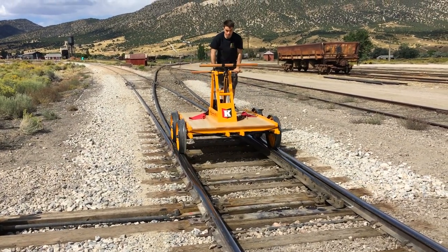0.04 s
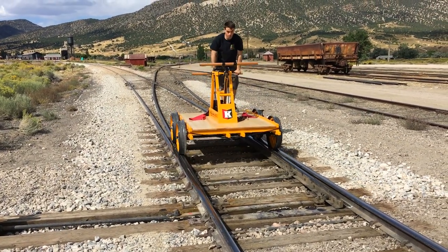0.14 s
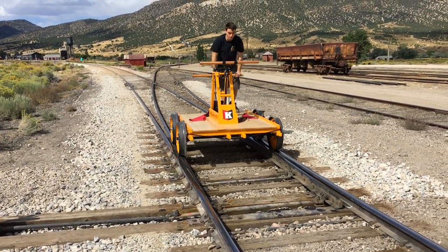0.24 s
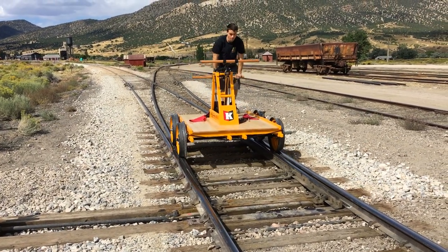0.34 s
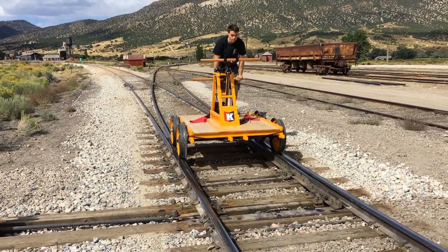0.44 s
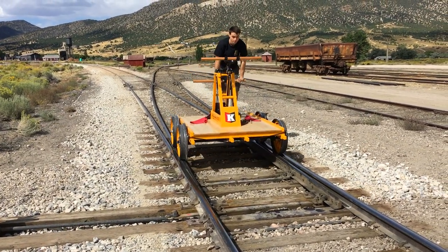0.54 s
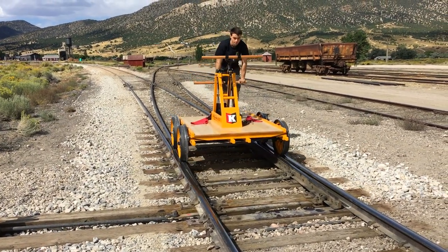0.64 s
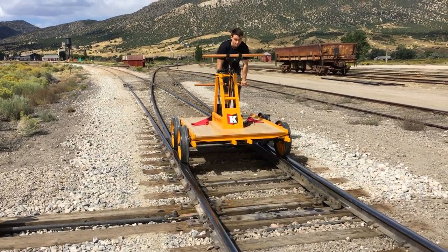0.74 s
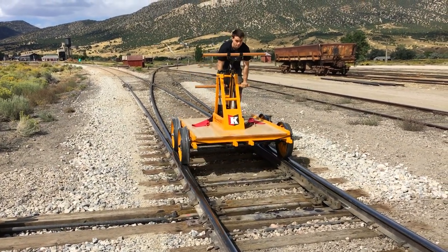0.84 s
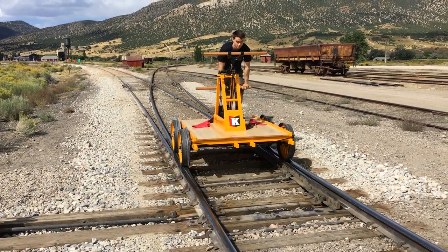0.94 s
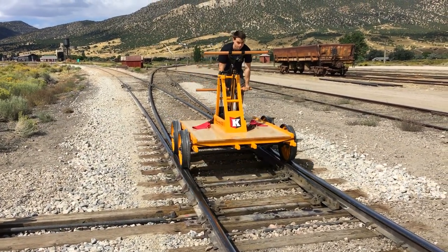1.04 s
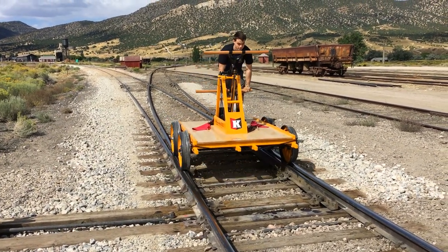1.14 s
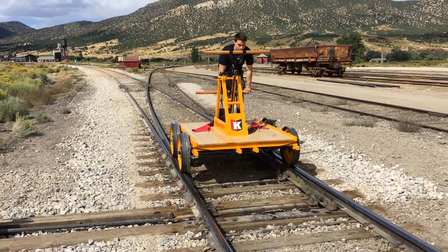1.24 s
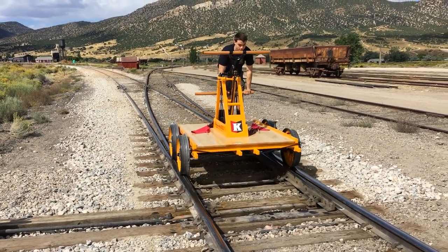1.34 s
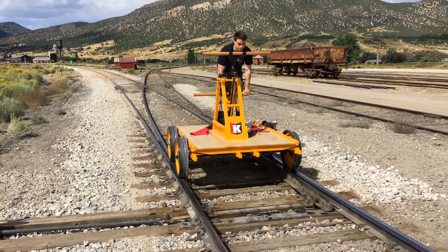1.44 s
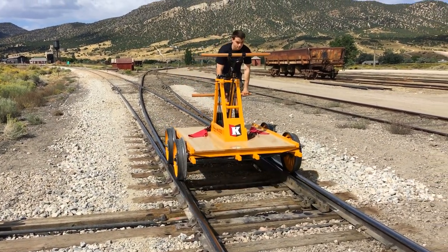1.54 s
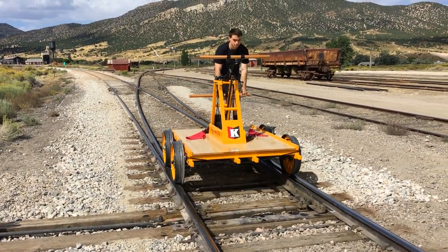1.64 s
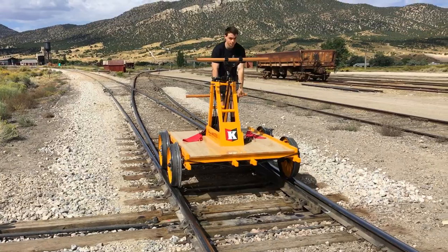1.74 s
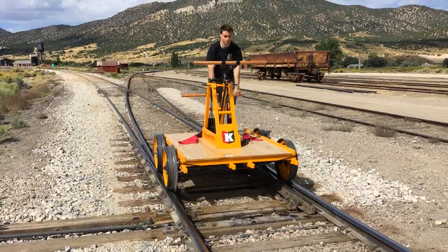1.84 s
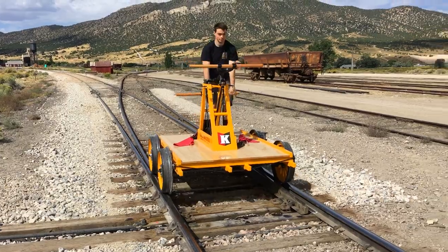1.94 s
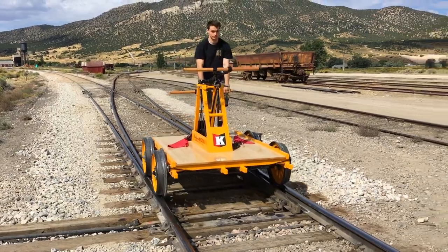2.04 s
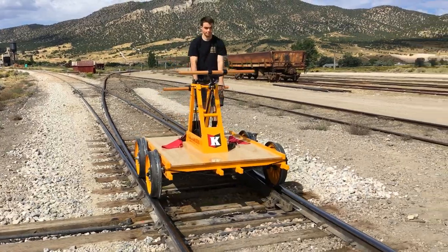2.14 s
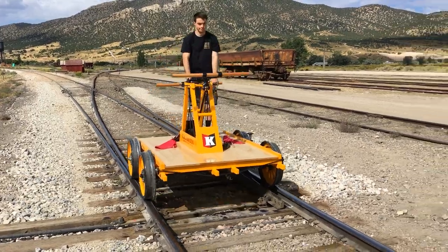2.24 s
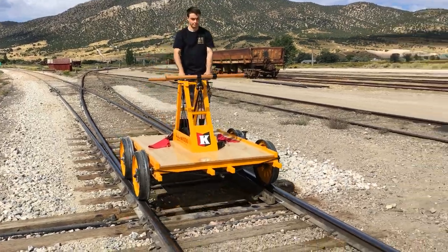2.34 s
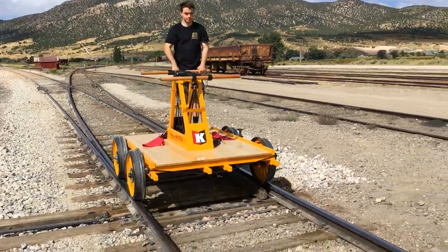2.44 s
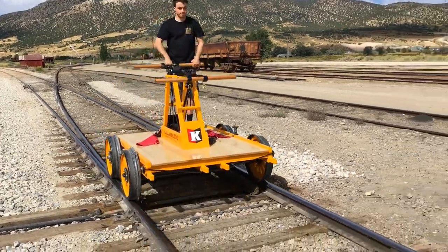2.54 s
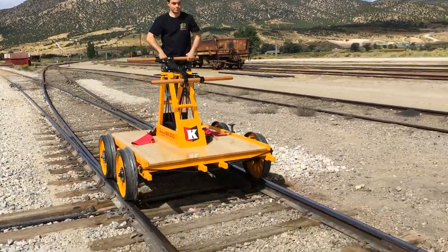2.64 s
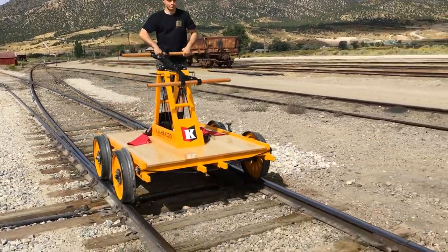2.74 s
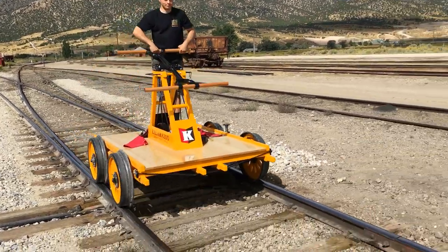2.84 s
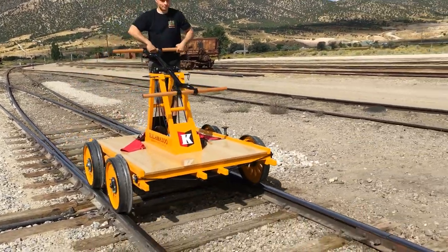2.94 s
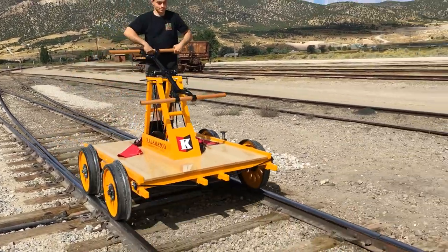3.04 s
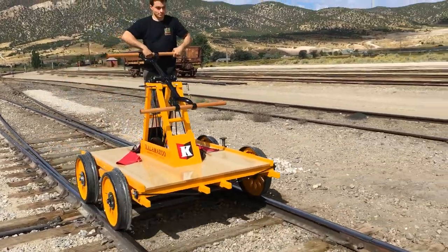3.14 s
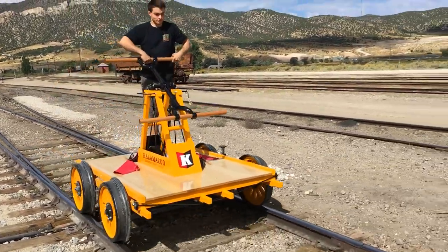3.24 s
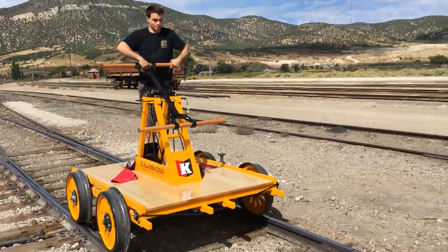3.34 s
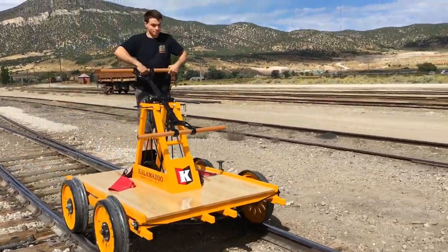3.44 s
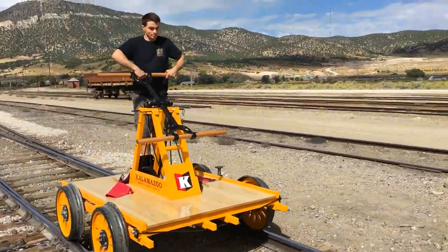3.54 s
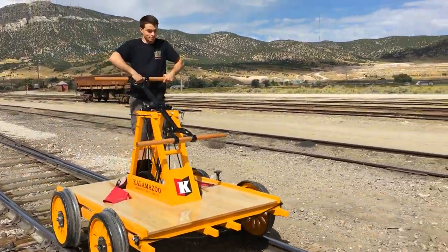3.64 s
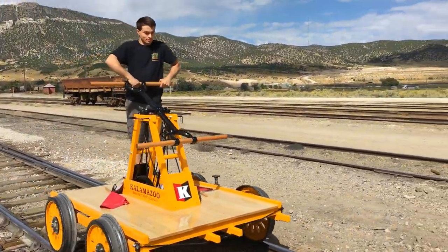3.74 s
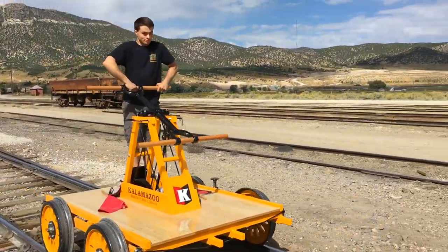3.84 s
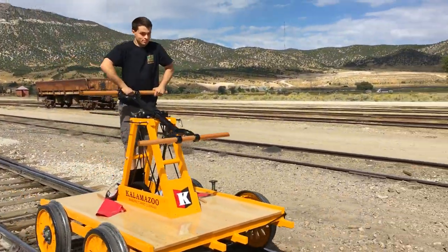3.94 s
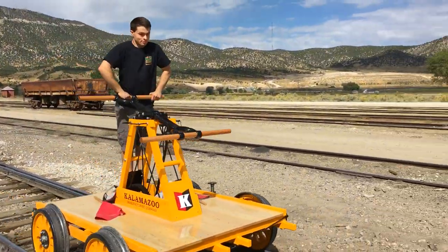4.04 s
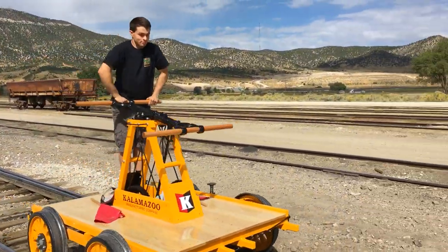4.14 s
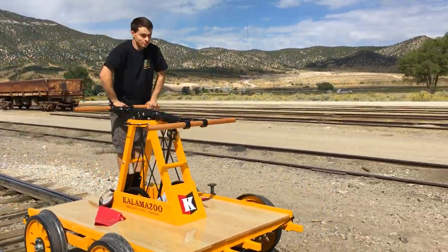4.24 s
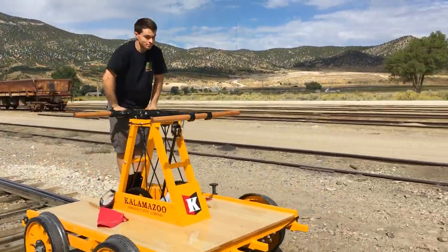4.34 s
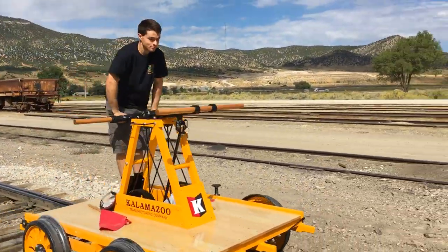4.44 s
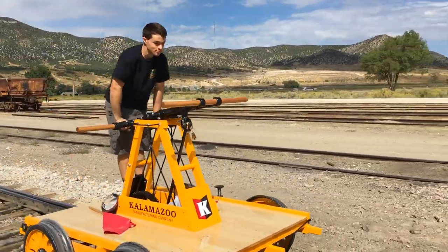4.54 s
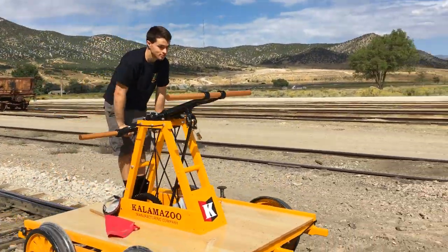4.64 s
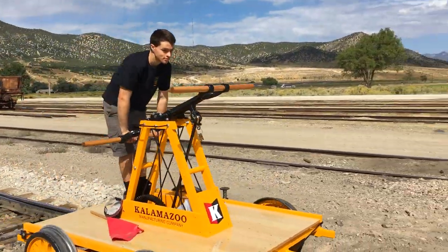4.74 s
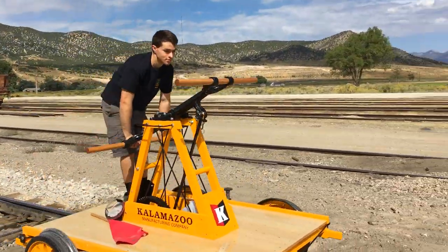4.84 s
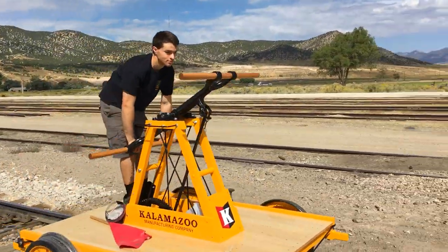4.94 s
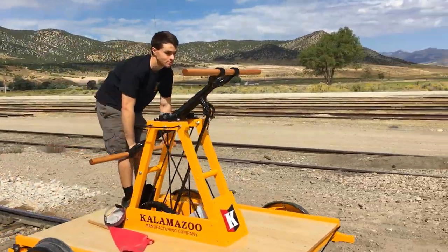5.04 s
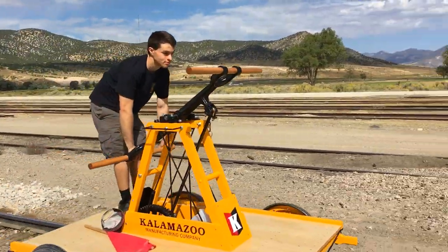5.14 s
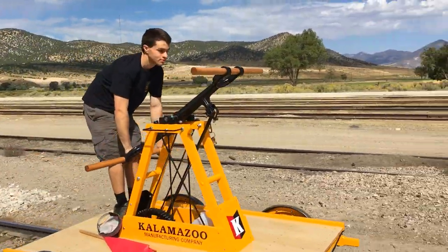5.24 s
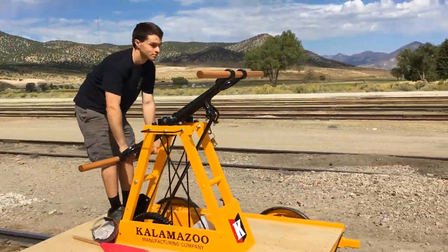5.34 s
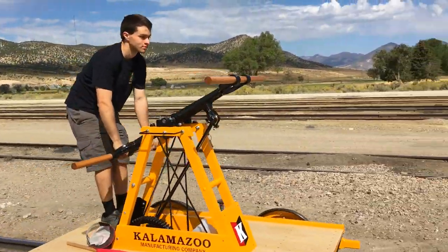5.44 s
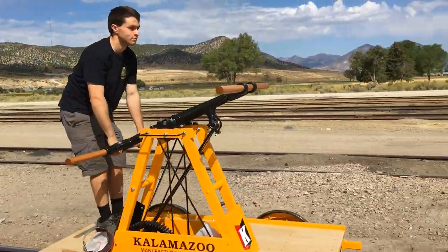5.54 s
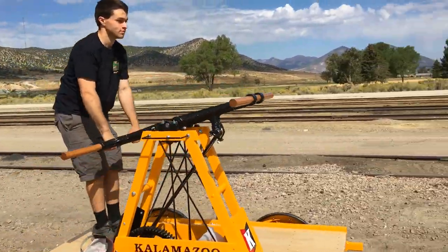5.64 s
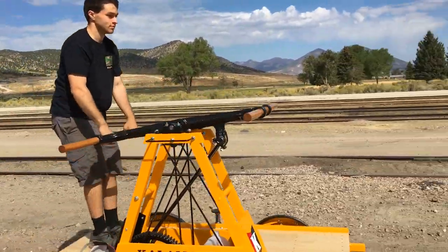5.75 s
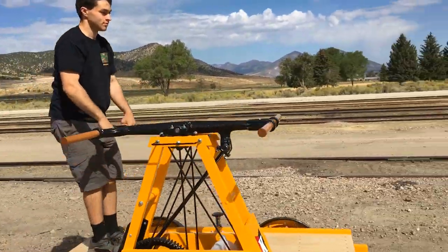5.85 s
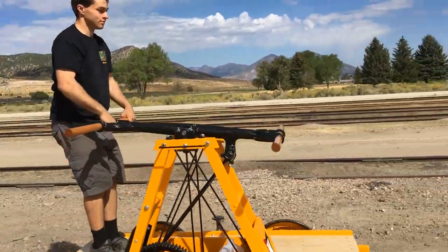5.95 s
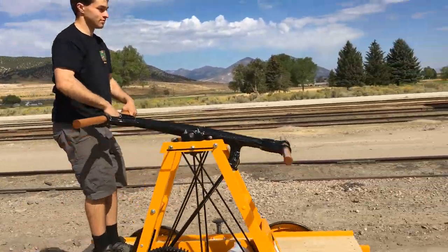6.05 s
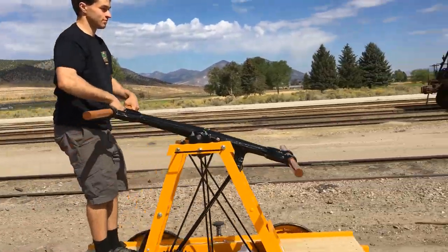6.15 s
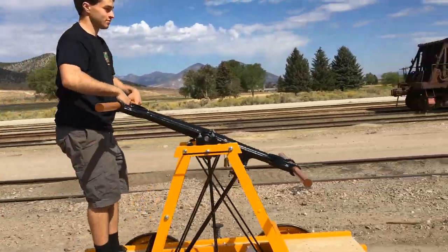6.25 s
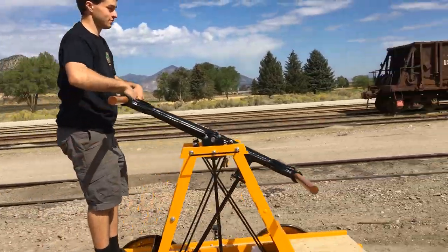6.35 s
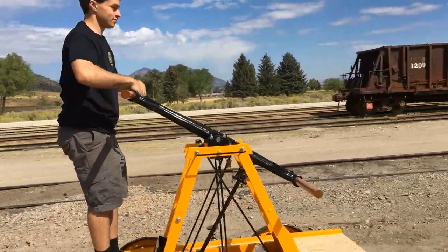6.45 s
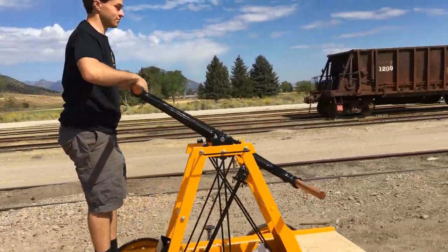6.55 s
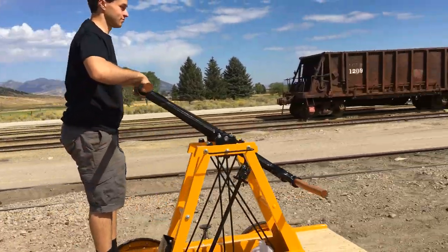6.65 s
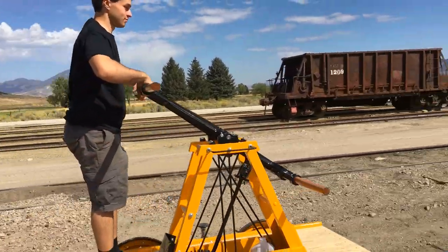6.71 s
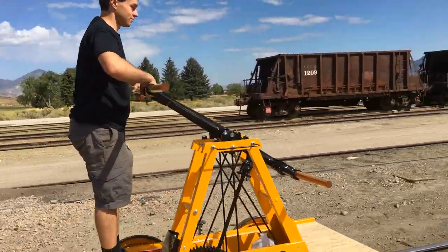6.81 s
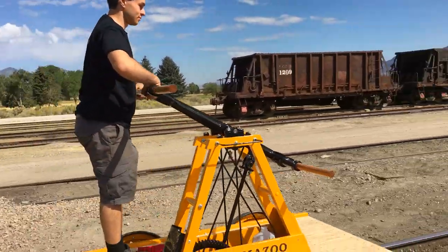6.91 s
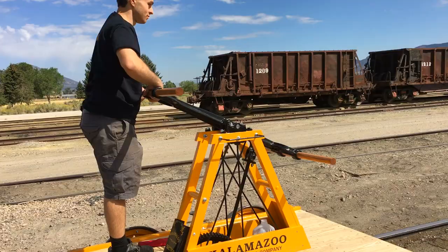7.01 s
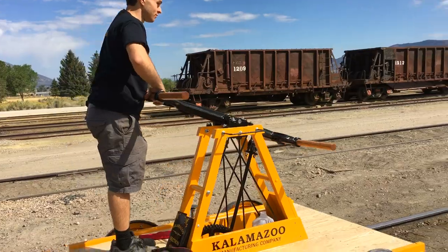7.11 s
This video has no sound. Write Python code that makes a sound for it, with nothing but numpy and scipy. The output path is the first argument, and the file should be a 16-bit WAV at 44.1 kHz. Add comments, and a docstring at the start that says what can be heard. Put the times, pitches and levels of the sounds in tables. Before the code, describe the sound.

A hand-pumped rail car rolls closer on steel track, rumbling and rattling louder, crunching grit and clacking twice over a rail joint.

```python
"""A hand-pumped rail car rolls up along steel track in an open yard, heard from close beside the line.
Tread roughness drives the wheels and rails into ringing and shakes the wooden deck and frame.
Both axles clack over a rail joint, and the car gives off knocks, rattles and short wheel pings.
Close by, crushed grit ticks, crunches, snaps and squeaks, and fine dust scuffs. Beneath lie dull low
thumps and an uneven rumble, partly wind buffeting the microphone, and the far hum of the yard."""
import sys
import numpy as np
from scipy import signal
from scipy.fft import rfft, irfft, next_fast_len
from scipy.io import wavfile
from scipy.ndimage import uniform_filter1d

SR = 44100
rng = np.random.default_rng(int(sys.argv[2]) if len(sys.argv) > 2 else 0)


def unload_audio(sound):
    """Save the sound as a 16-bit wav file, at the path given as the first command line argument."""
    columns = np.transpose(np.atleast_2d(sound))
    # keep every value between -1 and 1, then stretch to whole-number steps
    steps = np.round(np.clip(columns, -1, 1) * 32767)
    wavfile.write(sys.argv[1], SR, steps.astype(np.int16))


N = 316549


def from_db(db):
    """Decibels to amplitude ratio."""
    return 10 ** (np.asarray(db) / 20)


def rms_one(x):
    """Normalisation to unit rms."""
    return x / np.sqrt(np.mean(x ** 2) + 1e-20)


def peak_one(x):
    """Normalisation to unit peak."""
    return x / np.abs(x).max()


def drift(rate):
    """Random modulation: low-passed noise of unit rms, its corner near `rate` Hz."""
    r = np.exp(-80 * np.pi * rate / SR)
    slow = signal.lfilter([1], [1, -2 * r, r * r], rng.standard_normal(N // 40 + 2002))[2000:]
    return np.interp(np.arange(N) / 40, np.arange(len(slow)), rms_one(slow))


def coloured(x, spectrum):
    """Spectral shaping by a (frequency [Hz], level [dB]) curve, to unit rms."""
    hz, db = np.transpose(spectrum)
    size = next_fast_len(N)
    log_hz = np.log(np.arange(size // 2 + 1) * SR / size + 1)
    gain = from_db(np.interp(log_hz, np.log(hz), db, left=-90, right=-90))
    return rms_one(irfft(rfft(x, size) * gain, size)[:N])


def ring(x, hz, t60):
    """Damped resonator: its impulse response is a sine that falls 60 dB in t60 seconds."""
    r, w = from_db(-60 / (t60 * SR)), 2 * np.pi * hz / SR
    return signal.lfilter([0, np.sin(w)], [1, -2 * r * np.cos(w), r * r], x + 1e-18)


def band(x, low_hz, high_hz):
    """Causal band-pass filter."""
    sos = signal.butter(2, [low_hz, min(high_hz, .45 * SR)], "band", fs=SR, output="sos")
    return signal.sosfilt(sos, x)


def add(out, s, piece):
    """Superposition of a short sound at time s."""
    i = round(s * SR)
    out[i:i + len(piece)] += piece[:N - i]


def grains(per_s, spread_db):
    """Poisson process: clicks of random size and sign."""
    sizes = from_db(spread_db * np.minimum(rng.exponential(1, N), 5)) * rng.choice([-1, 1], N)
    return sizes * (rng.random(N) < per_s / SR)


def crushing(patches):
    """Attack and decay envelope: each patch swells quickly, sags while it lasts and dies away."""
    rise_s, sag_db_per_s, fall_db_per_s = 0.014, 10, 308.5
    out, t = np.zeros(N), np.arange(N) / SR
    for s, length, db in patches:
        sag_db = sag_db_per_s * np.clip(t - s, 0, length)
        fall_db = fall_db_per_s * np.clip(t - s - length, 0, 1)
        out += np.clip((t - s) / rise_s, 0, 1) * from_db(db - sag_db - fall_db)
    return out


# spectrum of the yard's far hum: (frequency [Hz], level [dB])
YARD_SPECTRUM = [(190, -38.5), (330, -1), (580, -2.5), (691, -6.5), (724, -1.5), (2520, -21), (3000, -45.5),
                 (3900, -67.5), (6600, -120)]


def yard():
    """Ambient noise: a steady, distant hum, strongest in the low middle range."""
    return from_db(-64) * coloured(rng.standard_normal(N), YARD_SPECTRUM)


# spectrum of the low rumble: (frequency [Hz], level [dB])
RUMBLE_SPECTRUM = [(12, -40), (22, -21), (43, 6), (92, 2.5), (110, -16), (140, -28), (240, -120)]


def rumble():
    """Amplitude-modulated noise: an uneven low rumble, partly wind buffeting the microphone."""
    return rms_one(coloured(rng.standard_normal(N), RUMBLE_SPECTRUM) * from_db(-2.0 * drift(29)))


# dull low thumps, partly wind on the microphone: (time [s], relative level [dB], frequency [Hz])
LOW_THUMPS = [(0.785, -32, 62.6), (1.189, -32, 65.3), (1.889, -34, 56), (2.059, -31, 66), (3.166, -25, 284),
              (3.424, -21.5, 93), (3.489, -19.5, 108), (3.61, -35, 62.5), (3.674, -22.5, 82),
              (3.777, -41, 51.5), (3.888, -18.5, 139), (3.953, -22, 110), (3.99, -39, 141),
              (4.009, -25.5, 90), (4.15, -18, 100), (4.229, -22, 310), (4.249, -20, 190), (4.266, -28, 262),
              (4.278, -25.5, 430), (4.301, -16, 83), (4.339, -24, 57), (4.342, -15.5, 197),
              (4.373, -18, 87), (4.405, -20, 90), (4.446, -16, 88), (4.66, -26, 294), (4.958, -19.5, 127),
              (5.055, -14.5, 85), (5.188, -12.5, 237), (5.289, -31, 230), (5.33, -22, 296),
              (5.39, -20, 287), (5.44, -29, 260), (5.591, -18.5, 305), (5.659, -16.5, 222),
              (5.777, -17.5, 288), (5.746, -27, 126), (5.79, -19, 119), (5.841, -24, 119), (5.88, -24, 119),
              (5.98, -22, 270), (6.028, -16, 215), (6.197, -30, 227), (6.389, -18.5, 281),
              (6.557, -21, 235), (6.229, -15, 261), (6.32, -18.5, 280), (6.673, -12.5, 222),
              (6.706, -14, 258), (6.727, -15, 269), (6.741, -18, 259), (6.853, -16.5, 284),
              (6.863, -19.5, 283), (6.919, -17, 245), (6.933, -19.5, 257), (7.05, -24, 262),
              (7.103, -22, 206)]


def low_thumps():
    """Damped oscillation: each dull thump is a one-cycle push on a resonator; higher ones die sooner."""
    out, t = np.zeros(N), np.arange(7000) / SR
    for s, db, hz in LOW_THUMPS:
        push = np.sin(2 * np.pi * np.clip(t * hz, 0, 1))
        add(out, s, from_db(db - 4.5) * peak_one(ring(push, hz, t60=0.095 * (100 / hz) ** 0.3)))
    return out


# spectrum of fine dust: (frequency [Hz], level [dB])
DUST_SPECTRUM = [(1500, -20), (2500, 7), (4000, 2.5), (6000, -12), (9000, -21), (12000, -25)]
# soft scuffs: (time [s], duration [s], level [dB])
DUST_SCUFFS = [(0.6, 0.09, -87), (0.715, 0.046, -79), (0.81, 0.02, -78), (1.028, 0.01, -79),
               (2.3, 0.027, -74), (2.495, 0.022, -64), (2.98, 0.035, -51), (3.04, 0.022, -49.5),
               (3.095, 0.048, -54), (3.18, 0.06, -61), (5.75, 0.046, -67.5), (5.89, 0.23, -71),
               (6.11, 0.057, -67), (6.2, 0.054, -69)]


def dust(steel_db):
    """Shot noise: tiny grains in loose clumps, heard in scuffs and faintly under the rolling wheels."""
    clumps = grains(5000 * from_db(6.5 * drift(59)), 2.2)
    return (crushing(DUST_SCUFFS) + from_db(steel_db - 25.5)) * coloured(clumps, DUST_SPECTRUM)


# spectrum of crushed grit: (frequency [Hz], level [dB])
GRIT_SPECTRUM = [(710, -46), (1200, 16), (1280, -5.5), (1950, 6), (3510, -7), (5300, -11), (7100, -23.5),
                 (12200, -23), (13300, -23.5), (15700, -29.5), (16000, -50.5)]
# patches of grit crushed: (time [s], duration [s], level [dB])
GRIT_PATCHES = [(1.99, 0.3, -63), (2.968, 0.1, -50), (3.078, 0.26, -56.5), (3.37, 0.031, -55),
                (3.49, 0.16, -54.5), (4.176, 0.036, -54), (4.533, 0.023, -62), (4.661, 0.014, -46),
                (4.733, 0.08, -48.5), (4.818, 0.019, -36), (5.135, 0.045, -53), (5.743, 0.62, -68)]


def crunch(steel_db):
    """Granular crushing: clumps of fine grains, and sparser cracks ringing at scattered pitches."""
    fine = coloured(grains(3000 * from_db(7.4 * drift(48)), 1.9), GRIT_SPECTRUM)
    cracks, pitch_index = grains(600, 3.0), rng.integers(0, 12, N)
    pitches = np.geomspace(1500, 13000, 12)
    rings = sum(hz * ring(cracks * (pitch_index == k), hz, 20.0 / hz) for k, hz in enumerate(pitches))
    loose_grit = from_db(steel_db - 26)
    return (crushing(GRIT_PATCHES) + loose_grit) * rms_one(fine + coloured(rings, GRIT_SPECTRUM))


def crack(noise, hz, treble_hz, t60, treble_db):
    """Noise transient: a burst breaks in small steps, its treble decaying sooner than its body."""
    rise_s, treble_decay_share = .0017, 0.85
    t = np.arange(noise.shape[1]) / SR
    steps = from_db(3.1 * rms_one(uniform_filter1d(noise[2], size=60)))
    fade = steps * (1 - np.exp(-t / rise_s)) * from_db(-60 * t / t60)
    treble_fade = fade * from_db(-60 * t / t60 * (1 / treble_decay_share - 1))
    body = band(band(noise[0] * fade, hz / 7.6, hz * 1.185), 400, hz * 2.02)
    treble = band(band(noise[1] * treble_fade, treble_hz / 2.8, treble_hz * 1.57), 1500, 18000)
    return peak_one(body) + from_db(treble_db) * peak_one(treble)


# ticks of grit: (time [s], body peak [dB], treble re body [dB])
GRIT_TICKS = [(0.248, -69, 6), (0.265, -57, -22), (0.342, -57, -18), (0.3695, -51, -13), (0.41, -66, -6),
              (0.671, -65, 2), (0.77, -63, 1), (1.031, -49.5, -9.5), (1.16, -45.5, -7.5),
              (1.402, -45.5, -23), (1.5403, -55, -10), (1.752, -55, -25), (1.862, -53, -6),
              (1.8947, -55, -6), (2.021, -44.5, -23), (2.0424, -46.5, -19), (2.11, -47, -25),
              (2.128, -42.5, -19), (2.2223, -53, -8), (2.273, -46.5, -7), (2.3215, -48, -10),
              (2.5027, -41.5, -14), (2.6524, -65, 4), (2.806, -43, -20), (2.861, -54, -1),
              (2.913, -43.5, -10.5), (2.9498, -30, -27), (2.9831, -30.5, -27), (3.005, -30, -30),
              (3.0196, -34, -18), (3.0394, -29.5, -38), (3.0514, -35, -34), (3.107, -39, -11),
              (3.1382, -40, -6), (3.164, -47, -6), (3.1852, -33.5, -29), (3.2139, -35.5, -22),
              (3.2394, -53, -15), (3.257, -41.5, -8.5), (3.275, -44, -13), (3.304, -30.5, -24),
              (3.3883, -31.5, -27), (3.498, -53, -22), (3.5352, -36, -23), (3.6037, -31, -36),
              (3.633, -47, -29), (4.186, -32, -12), (4.3396, -25.5, -19), (4.542, -30.5, -15),
              (4.563, -34.5, -19), (4.6157, -35, -18), (4.6704, -27, -19), (4.69, -31, -20),
              (4.784, -28, -26), (4.806, -32, -16), (4.9056, -30.5, -37), (4.9564, -32, -19),
              (5.1452, -35.5, -15), (5.1765, -32, -21), (5.2444, -39, -16.5), (5.5071, -34.5, -23),
              (5.6496, -36.5, -14), (5.759, -29.5, -24), (5.797, -43, -10), (5.819, -34, -27),
              (5.8998, -37, -24), (5.986, -44, -43), (6.0375, -36, -23), (6.125, -32.5, -24),
              (6.1647, -42, -10), (6.304, -38, -26), (6.39, -41, -35), (6.45, -41, -22), (6.6105, -37, -19),
              (6.7184, -49, -31), (7.0339, -41, -17), (7.0804, -33, -17)]


def ticks(steel_db):
    """Brittle fracture: grit ticks at listed times, and faintly at random, louder as the car nears."""
    body_hz, treble_hz, t60, faint_count = 2180, 7200, 0.044, 40
    out = np.zeros(N)
    faint = [(when * N / SR, steel_db[int(when * N)] + 1 + 5 * loud, -18.0 + 3.5 * bright)
             for when, loud, bright in zip(rng.random(faint_count), *rng.standard_normal((2, faint_count)))]
    rows = GRIT_TICKS + faint
    for (s, db, treble_db), noise in zip(rows, rng.standard_normal((len(rows), 4, 3000))):
        shape = np.array([body_hz, treble_hz, t60]) * np.exp(.1 * noise[3, :3])   # no two alike
        add(out, max(s - .0015, 0), from_db(db) * crack(noise, *shape, treble_db))
    return out


# sharp snaps of grit, and the rear axle's bright click on the joint: (time [s], peak [dB], frequency [Hz])
SHARP_SNAPS = [(0.3702, -45.5, 1790), (0.37, -60, 2600), (2.273, -46, 4750), (5.65, -37, 3800),
               (5.763, -43, 1950), (5.797, -52, 6000), (5.96, -35, 2480), (5.961, -52, 5100),
               (5.99, -44, 4200), (6.116, -52, 5940), (6.168, -43, 5600), (6.167, -44, 3900),
               (6.129, -40, 1540), (6.131, -31, 2050), (2.135, -58, 2300), (2.309, -52, 4200),
               (2.3223, -42, 3430), (2.501, -46, 3600), (2.951, -33, 2050), (2.984, -28.5, 5030),
               (2.985, -32, 3200), (2.991, -37, 4100), (3.001, -33, 3300), (3.021, -35, 3600),
               (3.0405, -30, 4200), (3.05, -29, 2170), (3.05, -34, 5000), (2.9535, -30, 2090),
               (3.007, -38, 5200), (3.047, -36, 4900), (3.053, -31, 3300), (3.058, -35, 2280),
               (3.063, -40, 4300), (3.067, -41, 2600), (3.082, -38, 3200), (3.112, -36, 2900),
               (3.141, -37, 3900), (3.15, -35, 2100), (3.19, -40, 2200), (3.215, -34, 3970),
               (3.258, -36, 3500), (3.279, -43, 2500), (3.3042, -20.5, 3700), (3.515, -33.5, 3650),
               (4.279, -39, 3040), (4.7422, -35, 3520), (4.743, -40, 5500), (4.761, -21.5, 3380),
               (4.7615, -34, 1900), (4.775, -33, 2950), (4.8405, -22, 6500)]


def snaps():
    """Impulse response: each snap is one click in a heavily damped mode."""
    out, click = np.zeros(N), np.arange(3000) == 0
    for s, db, hz in SHARP_SNAPS:
        t60 = 7.4 / hz
        add(out, s, from_db(db) * peak_one(ring(ring(click, hz, t60), hz, t60)))
    return out


# thin squeaks in the crunch: (time [s], relative level [dB])
GRIT_SQUEAKS = [(3.0031, -54), (3.021, -43), (3.0394, -64), (3.1433, -51), (3.2066, -61), (3.3034, -62)]


def squeaks():
    """Frictional excitation: brief rubbing drives one high mode."""
    out, t = np.zeros(N), np.arange(3000) / SR
    for s, db in GRIT_SQUEAKS:
        rubbing = rng.standard_normal(len(t)) * from_db(-60 * t / 0.06)
        add(out, s, from_db(db - 6) * peak_one(ring(rubbing, hz=13200, t60=0.021)))
    return out


def wood_modes(modes, waver_db):
    """Forced vibration: tread roughness shakes wooden modes, each waxing and waning on its own."""
    out = 0
    for hz, width_hz, db in modes:
        t60 = np.log(1000) / (2 * np.pi * width_hz)
        shaken = ring(ring(rng.standard_normal(N), hz, t60), hz, t60)
        out = out + from_db(db + waver_db * drift(9.1)) * rms_one(shaken)
    return out


# lower and higher frame mode: (frequency [Hz], nominal width [Hz], relative level [dB])
FRAME_LOW_MODE = [(118.3, 26, -11)]
FRAME_HIGH_MODE = [(156, 33.7, -6)]


def frame(swing_db):
    """Structural resonance: two low frame modes, the higher standing out while the car is far."""
    low = wood_modes(FRAME_LOW_MODE, waver_db=6.0)
    high = from_db(-0.22 * swing_db) * wood_modes(FRAME_HIGH_MODE, waver_db=3.0)
    return rms_one(low + high)


# plank modes of the deck: (frequency [Hz], nominal width [Hz], relative level [dB])
DECK_LOW_MODES = [(200.4, 27, -9.5), (234.2, 33.8, 1)]
DECK_MIDDLE_MODE = [(283.6, 19.1, -3.5)]
DECK_HIGH_MODES = [(322.3, 29.6, -8.5), (378.4, 41, -12.5), (424, 16.4, -19)]


def deck(swing_db):
    """Modal radiation: the higher plank modes carry less far and come up as the car nears."""
    middle = from_db(0.34 * swing_db) * wood_modes(DECK_MIDDLE_MODE, waver_db=2.0)
    high = from_db(-1 + 0.57 * swing_db) * wood_modes(DECK_HIGH_MODES, waver_db=2.5)
    return (wood_modes(DECK_LOW_MODES, waver_db=1.5) + middle + high) * from_db(-3.0)


# knocks, rattles and short wheel pings from the car:
# (time [s], note peak [dB], frequency [Hz], rattle re note [dB], contact time [s])
CAR_KNOCKS = [(1.407, -29.5, 748, -4.5, 0.0091), (1.417, -44, 865, -3, 0.008),
              (1.44, -44.5, 704, -6, 0.022), (1.46, -47, 890, -12, 0.029), (1.674, -43, 674, -7, 0.0072),
              (1.945, -45, 945, -2, 0.0066), (2.39, -44.5, 1070, -15, 0.017),
              (3.438, -36, 740, -3.5, 0.0078), (3.503, -43, 736, 7, 0.011), (3.641, -40, 722, 3, 0.023),
              (4.014, -24, 474, -30, 0.0022), (4.188, -50, 930, -15, .007), (4.22, -35, 877, -10, 0.014),
              (4.237, -38, 980, -13, 0.0088), (4.309, -37, 1960, -15, 0.0071),
              (4.314, -40, 1204, -7, 0.024), (4.339, -26, 424, -7.5, 0.0054),
              (4.446, -36, 570, -14, 0.0048), (4.91, -33.5, 1270, -8, 0.013), (4.953, -41, 507, 12.5, 0.01),
              (4.952, -37.5, 1950, -15, .016), (5.286, -36.5, 750, 5.5, 0.0086),
              (5.485, -39, 647, 5.5, 0.014), (6.125, -38.5, 956, 5, 0.011), (6.672, -36.5, 1510, 1, 0.024),
              (6.706, -29.5, 656, -8, 0.015), (6.78, -42, 1520, 1, 0.014), (6.797, -33, 694, -7, 0.012),
              (6.954, -27.5, 705, -7, 0.0098), (7.036, -40.5, 1465, 8, .014), (7.077, -36, 630, -8, 0.0094),
              (7.097, -33.5, 627, 1, 0.0082), (7.112, -24.5, 655, -5, 0.0058)]


def knocks():
    """Impact excitation: an uneven blow rings one mode and sets loose parts rattling."""
    rattle_t60 = 0.15
    out, t = np.zeros(N), np.arange(8000) / SR
    for s, db, hz, rattle_db, blow_s in CAR_KNOCKS:
        noise = rng.standard_normal(len(t))
        blow = np.sin(np.pi * np.clip(t / blow_s, 0, 1))
        unevenness = 1 + .8 * rms_one(uniform_filter1d(noise[::-1], size=40))
        note = ring(np.sin(2 * np.pi * hz * t) * blow * unevenness, hz, t60=0.02)
        shaken = noise * (1 - np.exp(-t / 0.0041)) * from_db(-60 * t / rattle_t60)
        rattle = band(band(shaken, hz * 0.64, hz * 1.64), hz * 0.4, hz * 3.45)
        add(out, s - .005, from_db(db) * (peak_one(note) + from_db(rattle_db) * peak_one(rattle)))
    return out


# spectrum of the rolling roar: (frequency [Hz], level [dB])
ROAR_SPECTRUM = [(300, -49.5), (450, -3), (560, -5), (650, -4.5), (820, -11), (1000, -2.5), (1300, -7),
                 (2100, -10), (2800, -19.5), (4200, -26), (4800, -37), (6000, -34.5), (7500, -60),
                 (10000, -59)]
# wheel and rail modes: (frequency [Hz], rolling level [dB], front axle strike [dB],
# rear axle strike [dB], free decay time [s])
STEEL_MODES = [(754, -5.5, -14, 9, 0.15), (993, 17, -7, 13.5, 0.072), (1097, 12, -5, -18, 0.069),
               (1487, 9.5, -15, 7, 0.18), (1712, -4, -16, 1, 0.15), (1937, 12, 16, 7, 0.086),
               (2245, -13.5, 13, 3.5, 0.11), (2505, 3.5, 8, 1, 0.087), (3276, -1, -19, 4, 0.07),
               (4170, -28, 7, -26, 0.13)]


def rolling_steel():
    """Rolling noise: tread roughness makes a broad roar; small impacts keep the steel modes ringing."""
    roar = coloured(rng.standard_normal(N), ROAR_SPECTRUM) * from_db(0.33 * drift(34))
    roar += band(roar, 2600, 12000) * (from_db(3 * drift(6.3)) - 1)   # the treble swells on its own
    # the contact patch smooths the impacts, so little reaches past the top mode
    impacts = band(band(grains(1500, 2.4), 460, 3800), 400, 5000)
    modes = sum(from_db(db + 1.9 * drift(7.5)) * rms_one(ring(impacts, hz, t60 * 0.62))
                for hz, db, *_, t60 in STEEL_MODES)
    return rms_one((roar + from_db(-2.0) * rms_one(modes)) * from_db(1.55 * drift(15)))


# modes of the jolted deck: (frequency [Hz], level [dB], decay time [s])
JOLT_MODES = [(126, 2.5, 0.055), (235, 1, 0.051), (381, -0.5, 0.046)]
# each axle at the joint: (time [s], ring peak [dB], share of free decay time [1], rattle peak [dB],
# thump peak [dB], chatter duration [s], thump delay [s], crack delay [s], crack body peak [dB],
# treble re body [dB], chatter skew exponent [1])
AXLE_CROSSINGS = [(4.215, -20.5, 0.3, -19.5, -12.5, 0.0088, 0.0176, 0, -17, -13.5, 1),
                  (4.841, -13.5, 0.63, -21.5, -9.5, 0.02, 0.0146, 0.0012, -14.5, -17.5, 0.44)]


def rail_joint():
    """Impact noise: the tread chatters on the rail end, ringing the steel; the jolt then thumps the deck."""
    out, t = np.zeros(N), np.arange(12000) / SR
    push = np.sin(2 * np.pi * np.clip(t / 0.0039, 0, 1))
    thump = sum(from_db(db) * ring(push, hz, t60) for hz, db, t60 in JOLT_MODES)
    for axle, (s, ring_db, decay_share, rattle_db, thump_db, chatter_s, thump_delay, crack_delay,
               crack_db, treble_db, skew) in enumerate(AXLE_CROSSINGS):
        noise = rng.standard_normal((5, len(t)))
        contact = np.sin(np.pi * np.clip(t / chatter_s, 0, 1) ** skew)
        chatter = band(noise[0] * contact, 510, 7300)
        # the load on the wheel damps its modes
        ringing = sum(from_db(strike_db[axle]) * peak_one(ring(chatter, hz, t60 * decay_share))
                      for hz, _, *strike_db, t60 in STEEL_MODES)
        rattle = band(noise[1] * (1 - np.exp(-t / 0.0023)) * from_db(-60 * t / 0.18), 206, 970)
        clack = crack(noise[2:], hz=2060, treble_hz=6500, t60=0.053, treble_db=treble_db)
        add(out, s, from_db(ring_db) * peak_one(ringing) + from_db(rattle_db) * peak_one(rattle))
        add(out, s + crack_delay, from_db(crack_db) * clack)
        add(out, s + thump_delay, from_db(thump_db) * peak_one(thump))
    return out


# gains during the approach: (time [s], rumble [dB], frame [dB], deck [dB], steel [dB])
APPROACH = [(0.0, -50, -57.5, -53.5, -74.5), (0.82, -55.5, -52, -46, -66), (1.56, -49.5, -47.5, -46, -63.5),
            (2.44, -61, -43.5, -42, -55), (2.96, -44, -46, -36.5, -51), (3.18, -46.5, -42, -38, -47.5),
            (3.26, -44, -48, -43, -54.5), (3.36, -45, -39.5, -35, -49.5), (3.6, -36.5, -40.5, -40.5, -51.5),
            (4.1, -34.5, -34.5, -43.5, -50), (4.32, -32, -31.5, -33.5, -46.5),
            (4.48, -37.5, -36, -36, -47.5), (4.88, -48, -31, -34.5, -41.5), (5.2, -46, -36.5, -32, -45),
            (5.6, -63, -38.5, -29.5, -44.5), (5.8, -60, -32, -34, -44), (5.96, -57, -42.5, -32, -42.5),
            (6.54, -54.5, -33.5, -33.5, -42.5), (6.73, -58, -41.5, -34.5, -42), (6.8, -49, -38, -44, -43.5),
            (6.88, -59, -61, -36, -41), (6.99, -52, -44, -41.5, -44), (7.07, -39, -28, -33.5, -39.5),
            (7.18, -47, -44, -39.5, -42)]


def scene():
    """Superposition: rumble and rolling noise follow their gain curves; grit, impacts and yard add to them."""
    times, *gains = np.transpose(APPROACH)
    rumble_db, frame_db, deck_db, steel_db = [np.interp(np.arange(N) / SR, times, db) for db in gains]
    swing_db = steel_db - steel_db.mean()   # rises as the car nears
    lows = from_db(rumble_db) * rumble() + low_thumps()
    rolling = from_db(frame_db) * frame(swing_db) + from_db(deck_db) * deck(swing_db)
    rolling += from_db(steel_db) * rolling_steel()
    grit = crunch(steel_db) + dust(steel_db) + ticks(steel_db) + snaps() + squeaks()
    return (yard() + lows + grit + rolling + knocks() + rail_joint())[None]


# spectrum of the microphone hiss: (frequency [Hz], level [dB])
HISS_SPECTRUM = [(1470, -28), (2500, -43), (2830, -75), (3330, -51.5), (3980, 34.5), (6500, 33.5),
                 (9000, 33.5), (10700, 29), (12500, 33), (14800, 27), (15800, 19.5), (15950, -25)]


def record(dry):
    """Self-noise and band limiting: microphone hiss, a bass roll-off and a steep top cut."""
    low_hz, high_hz = 36.4, 16400
    hiss = from_db(-80.5) * coloured(rng.standard_normal(N), HISS_SPECTRUM)
    thinned = signal.sosfilt(signal.butter(3, low_hz, "high", fs=SR, output="sos"), dry + hiss)
    return signal.sosfilt(signal.cheby2(16, 70, high_hz, fs=SR, output="sos"), thinned)


dry = scene()
out = record(dry)
unload_audio(out)
```